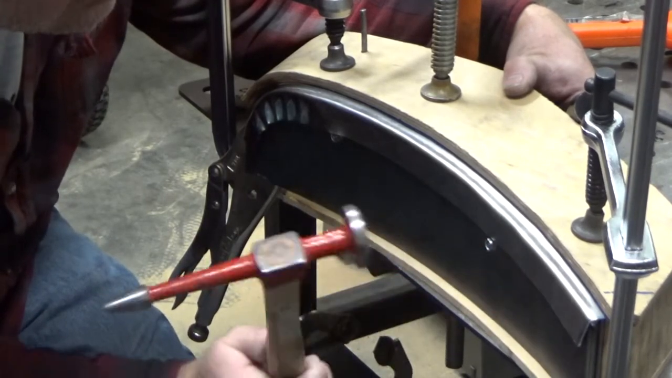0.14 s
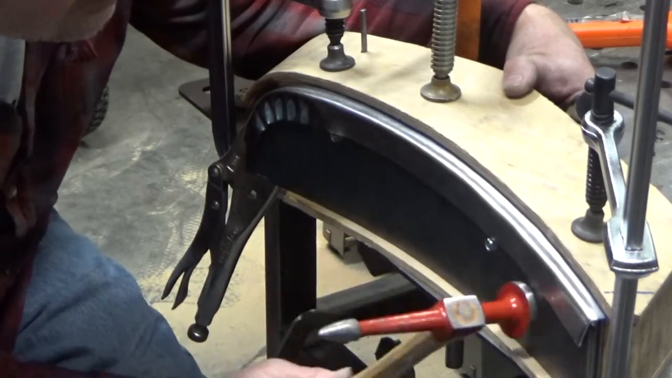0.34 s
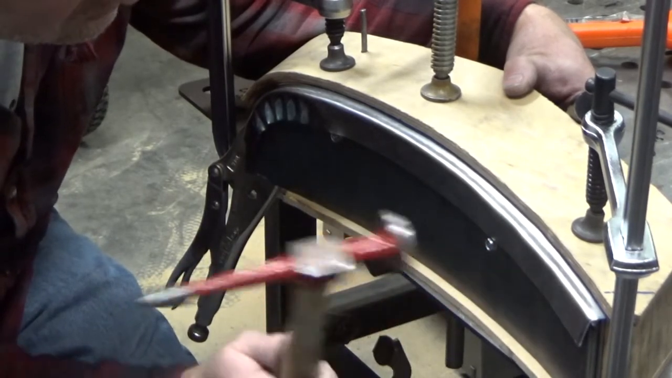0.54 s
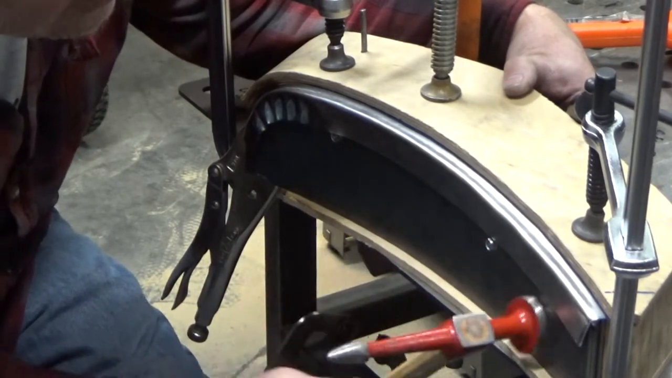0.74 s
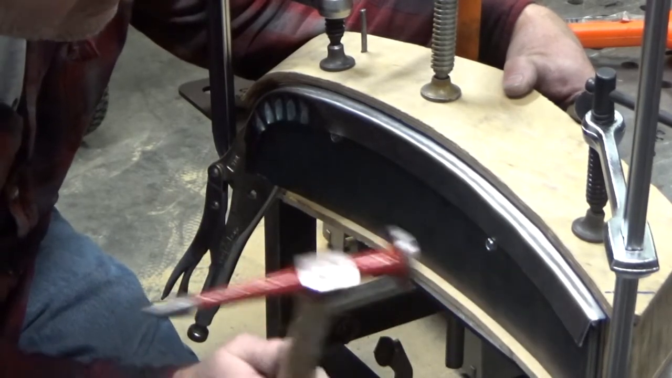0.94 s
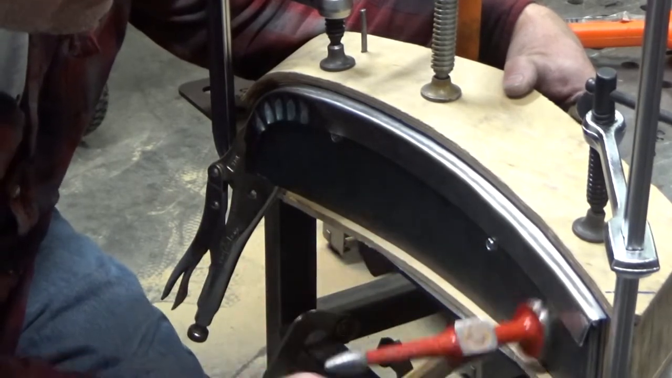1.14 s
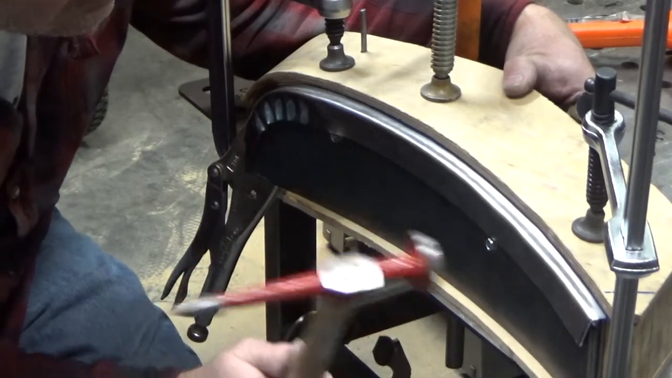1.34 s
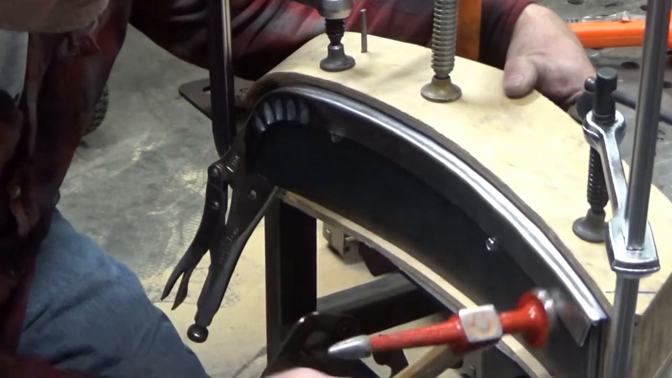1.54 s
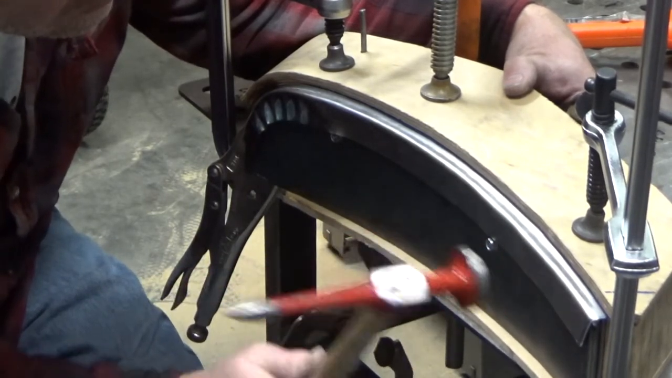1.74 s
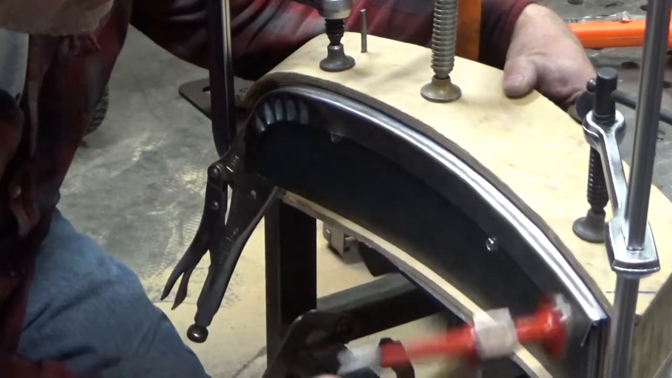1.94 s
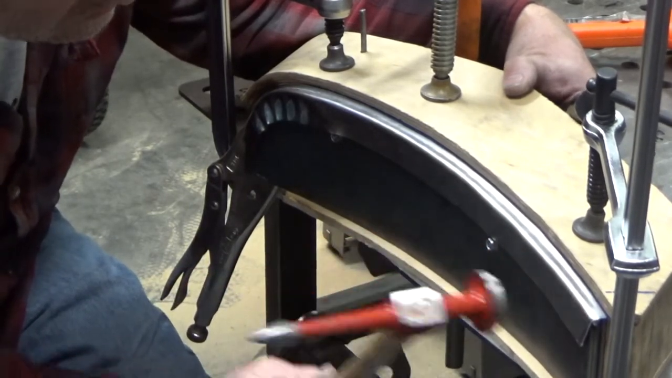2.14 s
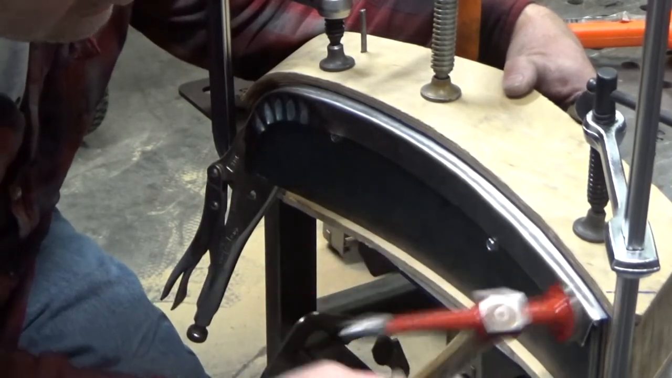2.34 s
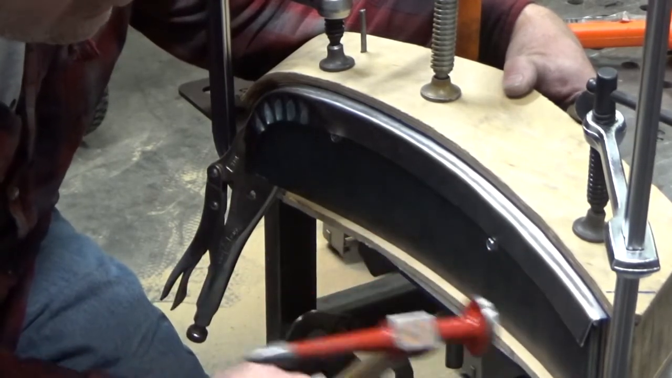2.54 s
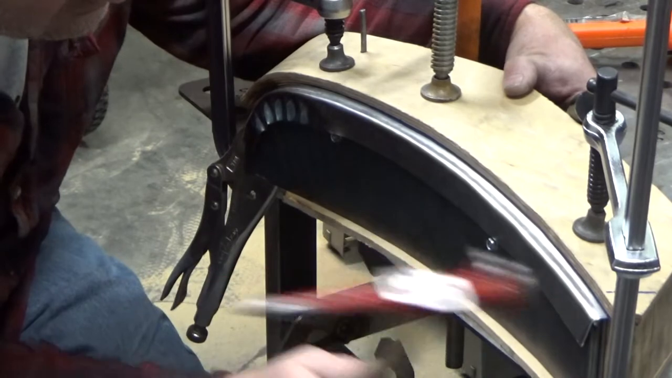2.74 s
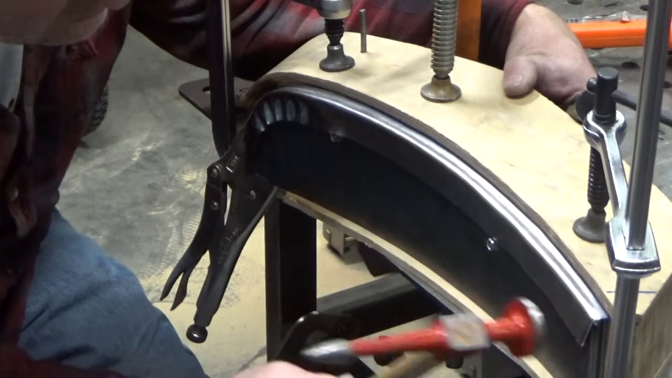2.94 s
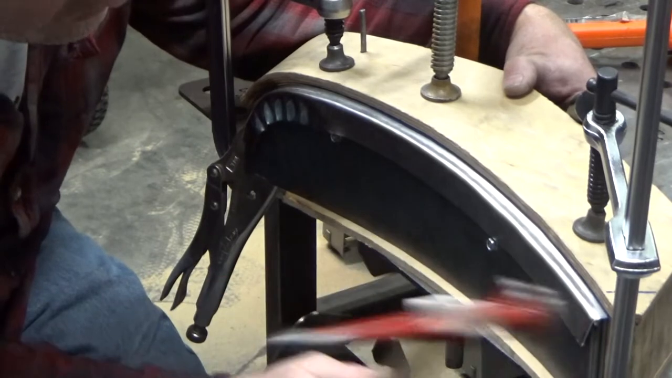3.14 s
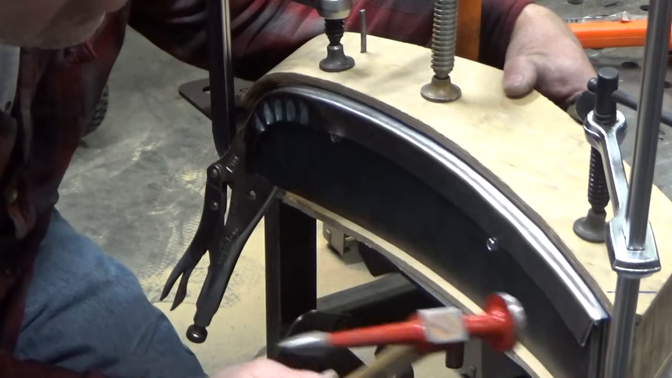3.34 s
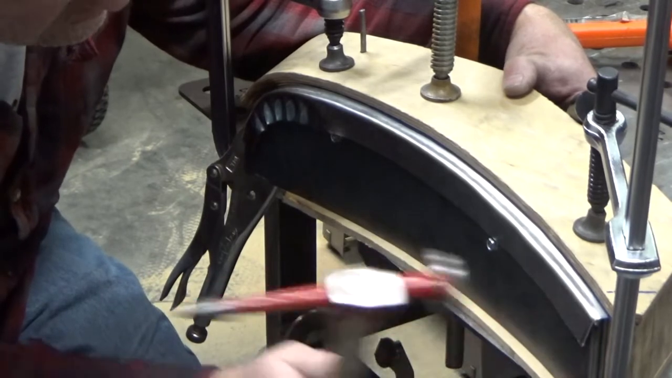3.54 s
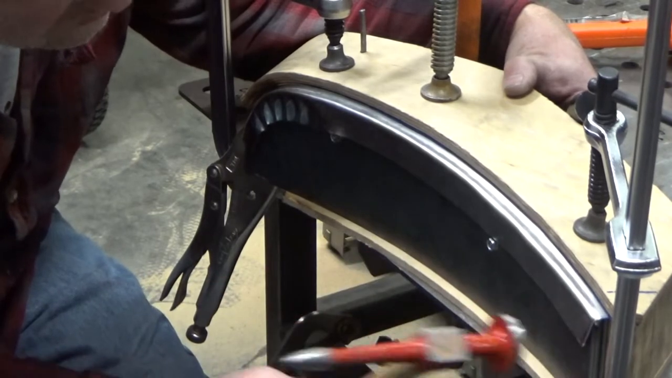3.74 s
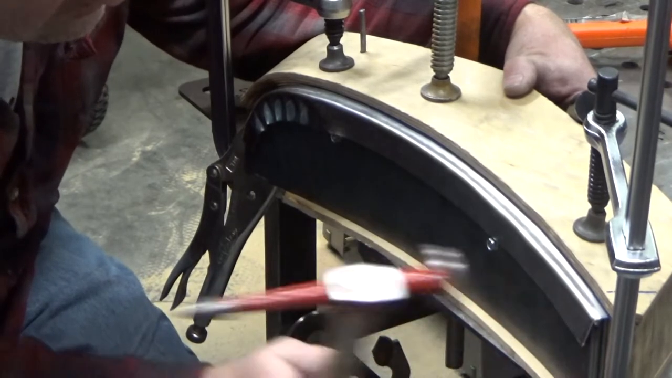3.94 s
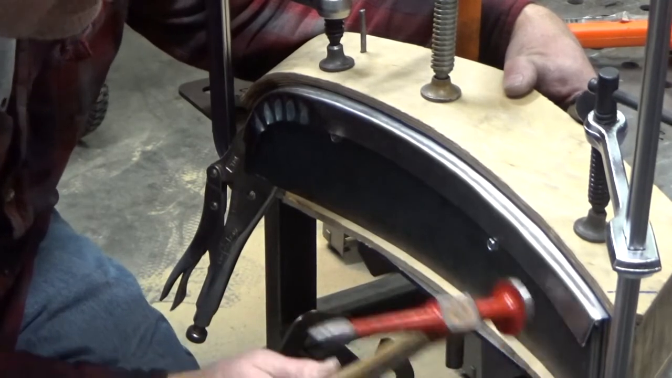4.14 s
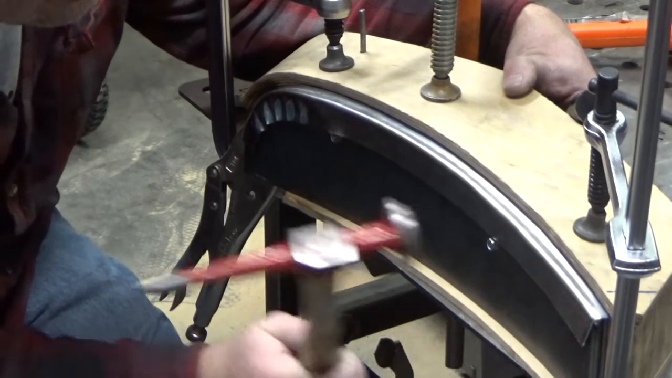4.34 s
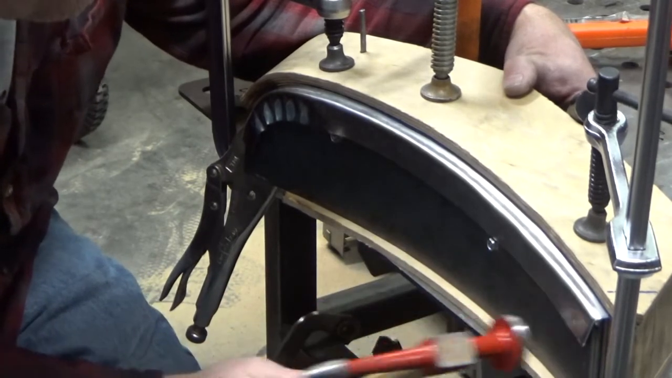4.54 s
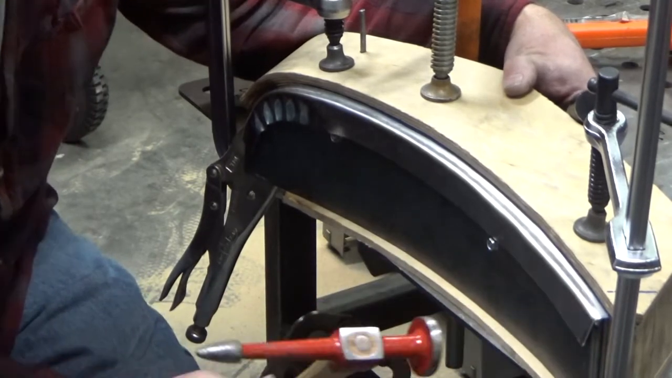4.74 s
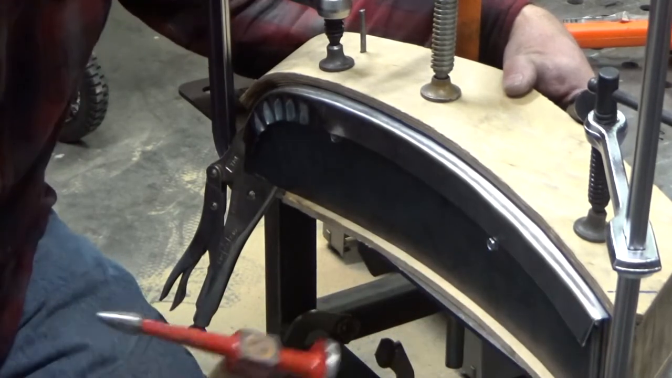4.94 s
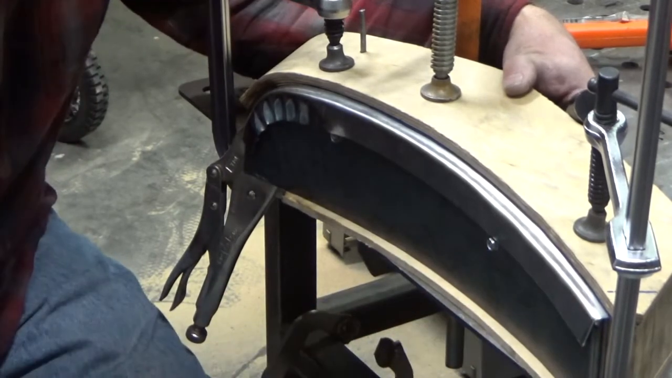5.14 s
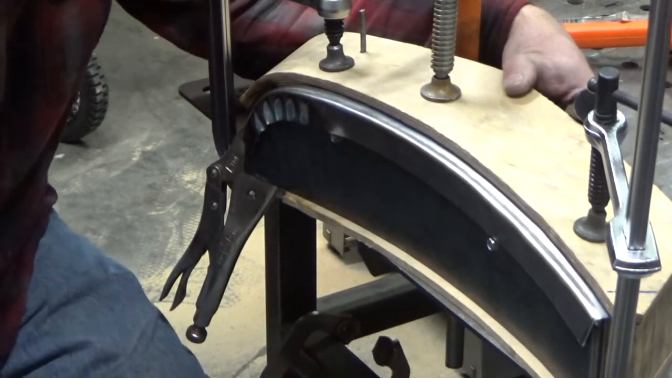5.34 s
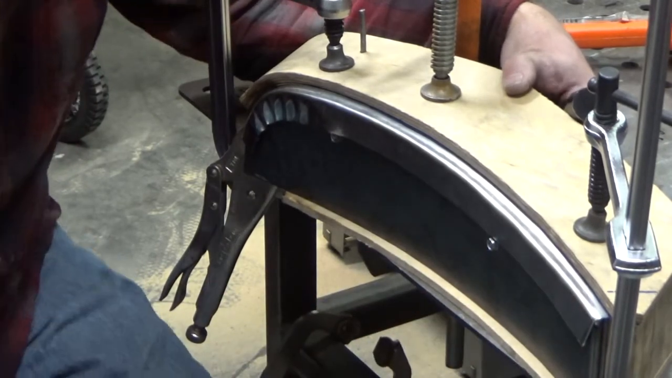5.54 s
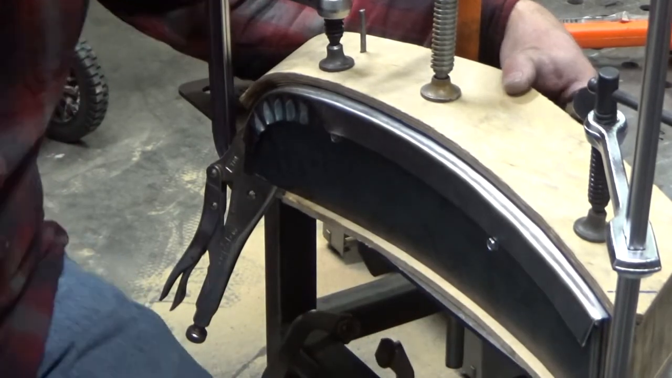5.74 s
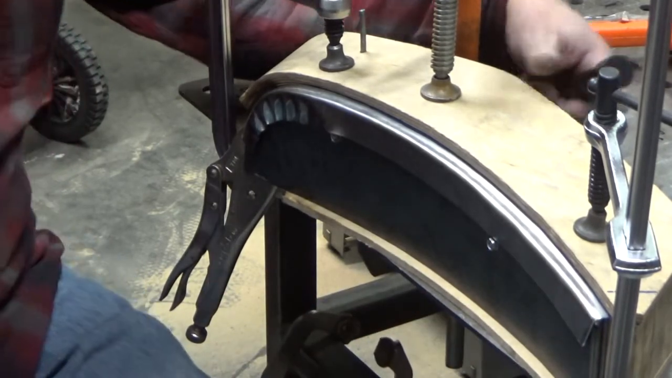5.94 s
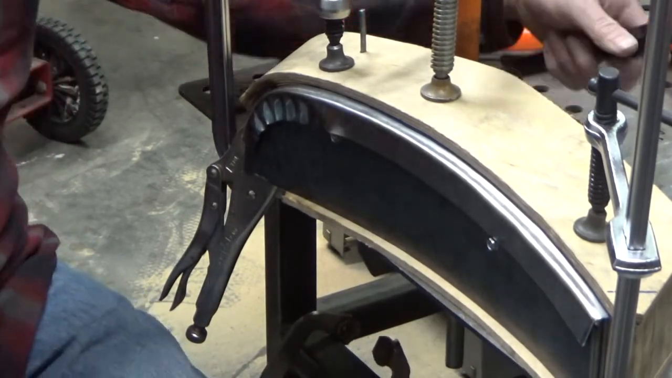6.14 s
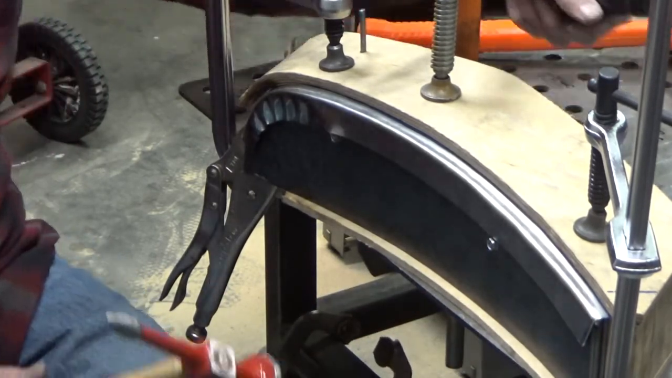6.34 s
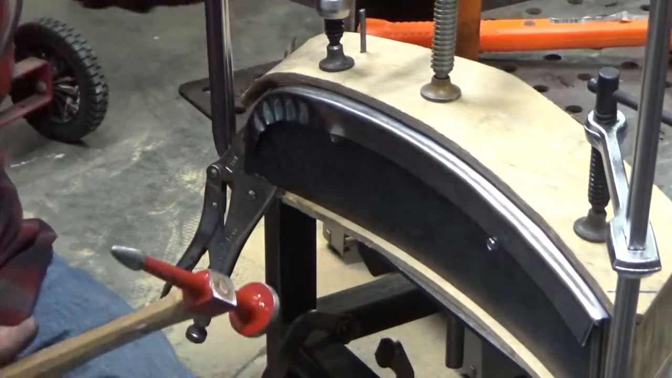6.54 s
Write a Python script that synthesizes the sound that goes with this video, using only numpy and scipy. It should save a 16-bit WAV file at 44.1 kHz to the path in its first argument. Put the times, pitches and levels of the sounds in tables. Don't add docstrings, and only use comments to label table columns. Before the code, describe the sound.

Close up in a reverberant garage, a body hammer strikes thin sheet steel clamped over a wooden form, a little over two blows a second. Each hit is a bright, dense, flattened crash with a short clattery tail and high ringing. After about five seconds the blows stop; the ring fades over faint lamp hum, then a stool drags and tools clink.

```python
import sys
import numpy as np
from scipy import signal
from scipy.fft import rfft, irfft, next_fast_len
from scipy.io import wavfile
from scipy.ndimage import uniform_filter1d, minimum_filter1d, map_coordinates

SR = 44100
rng = np.random.default_rng(int(sys.argv[2]) if len(sys.argv) > 2 else 0)


def field_ratio(decibels):
    return 10 ** (np.asarray(decibels, dtype=float) / 20)


def dump_mix(stems):
    frames = np.atleast_2d(stems).T
    limited = np.clip(frames, -1, 1)
    pcm = np.round(limited * 32767).astype(np.int16)
    wavfile.write(sys.argv[1], SR, pcm)


N = 294588

# start in seconds, strength, body, bite and edge in dB.
BLOWS = [(-.03, -5, -0.5, -2, 0), (.398, -7.5, -1, -2.5, -1), (.814, -7.5, -1, -2, -0.5),
         (1.251, -8.5, -0.5, 0.5, 1), (1.671, -7.5, -1, 0, 1), (2.071, -7.5, -1.5, 2.5, 1),
         (2.506, -8, -2.5, 0.5, 2), (2.923, -9, -1.5, -1.5, 2), (3.35, -9.5, -2, -1.5, 0),
         (3.742, -10, 1, -1, 1), (4.17, -8.5, 0, -1.5, 2.5), (4.568, -7.5, -0.5, -0.5, 0.5),
         (4.985, -9, -1.5, -2, 0)]
# quiet spot in seconds,
# face ring, tone before, dip and tone after in dB.
HEAD = [(.1, -8, -38, 4, -24), (.588, -27.5, -33.5, -2, -27), (1.008, -19, -40, -26, -29),
        (1.52, -.5, -29.5, -9.5, -29), (1.938, -7, -29, -10, -28.5), (2.348, 4.5, -34, -14, -32),
        (2.778, 0, -29.5, -12.5, -32.5), (3.186, -5, -24, -12, -28.5), (3.624, -1, -22.5, -7.5, -29.5),
        (4.004, 3, -34, -6, -39), (4.42, 3, -19.5, -19.5, -28.5), (4.834, -8.5, -40, -4.5, -32),
        (5.348, 4.5, -44, -27, -46)]
FACE_HZ = 10160


def unit(x):
    return x / np.sqrt(np.mean(x ** 2) + 1e-20)


def along(points, hz):
    f, v = np.transpose(points)
    return np.interp(np.log(hz + 1), np.log(f + 1), v)


def filtered(x, response):
    size = 2 * next_fast_len(x.shape[-1] // 2 + 4096)
    spectrum = rfft(x, size) * response(np.fft.rfftfreq(size, 1 / SR))
    return irfft(spectrum, size)[..., :x.shape[-1]]


def causal(db):
    cepstrum = irfft(db * np.log(10) / 20)
    half = len(cepstrum) // 2
    cepstrum[1:half] *= 2
    cepstrum[half + 1:] = 0
    return np.exp(rfft(cepstrum))


def peak(f, hz, width_hz, db):
    return field_ratio(db) * 1j * f * width_hz / (hz * hz - f * f + 1j * f * width_hz)


def pair(size, side_db):
    # frequency in Hz, left-right likeness 0-1.
    likeness = [(60, 1), (150, 0.96), (380, 0.86), (950, 0.47), (2380, 0.38), (5980, 0.48), (9500, 0.58),
                (11500, 0.9)]
    turn = lambda hz: np.arccos(np.clip(along(likeness, hz), -1, 1)) / 2
    mid_side = lambda hz: [np.cos(turn(hz)), field_ratio(side_db) * np.sin(turn(hz))]
    mid, side = filtered(rng.standard_normal((2, size)), mid_side)
    return np.array([mid + side, mid - side])


def add(out, start_s, x):
    k = round(start_s * SR)
    x = x[..., max(-k, 0):N - k]
    out[..., max(k, 0):max(k, 0) + x.shape[-1]] += x


def since_blow():
    t, start_s = np.arange(N) / SR, np.transpose(BLOWS)[0]
    k = np.searchsorted(start_s, t, side="right") - 1
    return k, t - start_s[k]


def background():
    # frequency in Hz, level in dB.
    hum_partials = [(119.8, 2.5), (240, -7.5), (359.8, 1)]
    # frequency in Hz, dB per Hz.
    air_db = [(15, -24), (25, -9.5), (129, -17.5), (183, -7.5), (349, 1), (410, -2), (1530, -3.5),
              (1950, -1.5), (3930, -7), (14300, -22), (15500, -40.5)]
    # level in dB, t60 in seconds.
    jolts = [(-49, 1.4), (-64, 1), (-53, 1), (-55.5, 1.3), (-49.5, .9), (-49.5, .9), (-51, 1),
             (-41.5, 0.73), (-54.5, 3), (-57, 4), (-55.5, 4), (-57.5, 1.5), (-49.5, 2.1)]
    hum_db, duck_db, recover_s = -70, -5, 0.26
    t, (k, age_s) = np.arange(N) / SR, since_blow()
    hum = sum(field_ratio(db - 0.5) * np.sin(2 * np.pi * (hz * t + rng.random())) for hz, db in hum_partials)
    air = unit(filtered(pair(N, side_db=-3.5), lambda f: field_ratio(along(air_db, f))))
    buzz_db, t60_s = np.transpose(jolts)[:, k]
    buzz = uniform_filter1d(field_ratio(buzz_db - 60 * age_s / t60_s), size=SR // 25)
    air_level = field_ratio(-59.5 + duck_db * np.exp(-age_s / recover_s))
    return (field_ratio(hum_db) + buzz) * hum + air_level * air


def shifting():
    # start, rise and hold in seconds, drag and scrape in dB.
    pushes = [
        (5.987, .015, .02, -52.5, -49),
        (6.04, .15, 0.057, -42, -49),
        (6.278, .008, .05, -62, -49),
        (6.395, .02, 0.084, -41, -37),
    ]
    # frequency in Hz, dB per Hz.
    drag_db = [(18, -44), (30, -13), (81, 2), (137, 3.5), (348, 3), (402, 9.5), (700, -26), (910, -60),
               (1540, -120)]
    scrape_db = [(290, -32.5), (500, -3.5), (978, -0.5), (1090, -5.5), (1250, -6), (2620, -12), (4500, -13),
                 (5850, -50), (9900, -120)]
    rustle_db = [(1760, -18), (3000, -3), (4950, -1.5), (5380, -5.5), (5640, 4), (11800, -8), (15500, -32)]
    # frequency and width in Hz, level in dB.
    tools = [(1700, 110, -6), (1960, 38, -5), (2230, 62, 0), (2340, 76, 0.5), (2650, 45, 3), (3260, 45, -1),
             (3520, 43, 3)]
    let_go_s = 0.95
    out, t = np.zeros((2, N)), np.arange(N) / SR

    def push(start_s, rise_s, hold_s):
        released_s = np.maximum(t - start_s - rise_s - hold_s, 0)
        return np.clip((t - start_s) / rise_s, 0, 1) * field_ratio(-60 * released_s / let_go_s)

    drag = sum(field_ratio(db) * push(s, rise, hold) ** 1.2 for s, rise, hold, db, _ in pushes)
    scrape = sum(field_ratio(db) * push(s, rise, hold) for s, rise, hold, _, db in pushes)
    rustle = field_ratio(-28.5) * scrape ** 0.56
    steel = lambda f: 1 + field_ratio(6.5) * sum(peak(f, *mode) for mode in tools)
    layers = [(drag, drag_db, 40, 2.5), (scrape, scrape_db, 90, 1.5), (rustle, rustle_db, 120, 1.5)]
    for level, colour, rate_hz, lumps_db in layers:
        coarse = rng.standard_normal(int(N * rate_hz / SR) + 4)
        lumps = map_coordinates(coarse, [np.arange(N) * rate_hz / SR])
        noise = filtered(pair(N, side_db=-5.5), lambda f: field_ratio(along(colour, f)) * steel(f))
        out += field_ratio(-5) * level * unit(field_ratio(lumps_db * lumps) * noise)
    return out


def knocks():
    # start in seconds, peak in dB, pitch and width in Hz.
    thuds = [(5.997, -39.5, 320, 32), (6.196, -34, 293, 200), (6.235, -40, 252, 200),
             (6.301, -43, 370, 109), (6.412, -30.5, 193.5, 40), (6.413, -30.5, 115, 40),
             (6.412, -41, 60, 40), (6.416, -33.5, 374, 40)]
    # start in seconds, peak in dB, pitch in Hz.
    clinks = [(6.05, -59, 4150), (6.11, -57, 3700), (6.284, -49, 4120), (6.29, -52, 3300),
              (6.305, -43.5, 1933), (6.437, -58, 5200), (6.468, -44, 5285), (6.47, -38, 1125),
              (6.44, -67, 11670)]
    # start in seconds, peak in dB, pitch and width in Hz, t60 in seconds.
    ticks = [(5.624, -59.5, 4500, 5020, .04), (5.997, -47.5, 2500, 2100, .4), (6.003, -53, 4000, 400, .37),
             (6.04, -51, 4100, 700, .3), (6.14, -58, 8260, 1500, .3), (6.197, -49, 4480, 2500, 0.38),
             (6.283, -36.5, 2330, 400, .12), (6.284, -39, 3600, 1700, 0.16), (6.397, -48.5, 9940, 4000, .2),
             (6.412, -43, 2110, 2990, .58), (6.522, -36, 2630, 298, 0.1)]
    thud_t60_s, clink_t60_s, clink_width_hz = 0.2, 0.5, 74
    out, t = np.zeros((2, N)), np.arange(SR // 2) / SR
    contacts = [(*row, thud_t60_s) for row in thuds]
    contacts += [(*row, clink_width_hz, clink_t60_s) for row in clinks]
    contacts += [tuple(row) for row in ticks]
    for start_s, db, hz, width_hz, t60_s in contacts:
        resonance = lambda f: peak(f, hz, width_hz, 0) * peak(f, hz, 2 * width_hz, 0)
        puff = unit(filtered(pair(len(t), side_db=-4.5), resonance))
        clean = 1 / (1 + (width_hz / 120) ** 2)
        ring = clean * np.sqrt(2) * np.sin(2 * np.pi * hz * t) + (1 - 0.51 * clean) * puff
        add(out, start_s, field_ratio(db - 2.0 - 60 * t / t60_s) * (1 - np.exp(-t * hz)) * ring)
    return out


def rings():
    # frequency in Hz, level in dB, t60 in seconds.
    form_modes = [(156.5, -49.5, 0.48), (204.4, -39.5, .6), (262, -45, 1), (303, -33, 0.72), (345, -37, .5),
                  (357.5, -19.5, 0.32)]
    form_rise_s, base_db, face_t60_s = 0.026, -16.5, 0.3
    out, t = np.zeros(N), np.arange(SR) / SR
    for (start_s, _, body_db, *_), (_, face_db, *_) in zip(BLOWS, HEAD):
        form = sum(field_ratio(db + rng.normal(0, 1.5) - 60 * t / t60_s) * np.sin(2 * np.pi * hz * t)
                   for hz, db, t60_s in form_modes)
        beat = 1 + 0.4 * np.sin(2 * np.pi * (22 * t + rng.random()))
        face = field_ratio(base_db + face_db - 60 * t / face_t60_s) * beat * np.sin(2 * np.pi * FACE_HZ * t)
        form *= field_ratio(body_db) * (1 - np.exp(-t / form_rise_s))
        add(out, start_s, form + np.minimum(t / 0.004, 1) * face)
    return out


def hammer_head():
    # time in seconds, tone in dB.
    lowered = [(5.348, -61), (5.482, -44.5), (5.678, -48), (5.728, -59), (5.838, -48.5), (5.894, -69.5),
               (6.11, -60), (6.254, -63)]
    tone_hz, quiet_half_width_s, fade_db_per_s, swell_s = 1933.3, 0.019, 34, 0.3
    knee_pan_db = 1.5
    t, (k, age_s) = np.arange(N) / SR, since_blow()
    quiet_s, _, before_db, dip_db, after_db = np.transpose(HEAD)[:, k]
    u = (t - quiet_s) / quiet_half_width_s
    swing_db = before_db + (after_db - before_db) * (1 + np.tanh(u)) / 2 + dip_db / (1 + u * u)
    swing_db -= fade_db_per_s * np.maximum(t - quiet_s, 0)
    swing = field_ratio(swing_db) * np.minimum(age_s / swell_s, 1)
    lowered_s, lowered_db = np.transpose(lowered)
    knee_db = np.interp(t, lowered_s, lowered_db, left=-120)
    level = np.where(t < lowered_s[0], swing, field_ratio(knee_db + [[knee_pan_db], [-knee_pan_db]]))
    tone = np.sin(2 * np.pi * tone_hz * t + np.array([[0.2], [-0.2]]))
    return level * field_ratio([[3.8], [2.2]]) * tone


def blows():
    # frequency in Hz, dB per Hz.
    crash_db = [(24, -52.5), (40, -30.5), (85, -31.5), (156, -14.5), (195, -22.5), (323, -9.5), (357, -13),
                (415, -11.5), (882, -5.5), (1320, -5), (1420, -5), (3890, -3), (10400, -8.5), (14400, -26),
                (16300, -41.5)]
    # frequency in Hz, t60 in seconds.
    garage = [(100, 0.37), (300, 0.64), (800, 0.64), (2000, 0.57), (5000, 0.53), (9000, 0.36), (15000, 0.2)]
    # frequency and width in Hz, level in dB, time in seconds when the hammer is nearest.
    sheet_modes = [(359.7, 17, 7.5, 2.7), (705, 25, 5.5, 2.7), (790, 6, -5, 5.7), (1053, 52, 3, 2.9),
                   (1410, 16, 4.5, 1.1), (1684, 35, 2, 3.6), (1880, 100, 0, 4.1), (2025, 110, -2.5, .8),
                   (2506, 14, 5, 2.8), (2650, 17, -0.5, 7.4), (3412, 10, 4, 0.44), (3910, 22, 5, .5),
                   (3970, 21, -9, 0.67), (3870, 12, -3.5, 3.8), (4060, 26, 0, 1.7),
                   (5450, 29.2, -9, 1.3333), (9200, 22, 18.5, 9.3)]
    # frequency and width in Hz, level in dB.
    panel = [(856, 260, -5), (14870, 370, 10.5)]
    # lag in seconds, level in dB.
    walls = [(0.077, -10.5), (.03, -22)]
    # level in dB, t60 in seconds.
    clamp = (-57, 1.7)
    clamp_hz, clump_db = 9001, 0.5
    clamp_db, clamp_t60_s = clamp
    out, t = np.zeros((2, N)), np.arange(SR + SR // 2) / SR
    for (start_s, db, body_db, bite_db, edge_db), (_, face_db, *_) in zip(BLOWS, HEAD):
        hz, frame_s, z = signal.stft(pair(len(t), side_db=-5.5), SR, nperseg=256)
        clumps = uniform_filter1d(rng.standard_normal(z.shape[1:]), size=3, axis=0)
        clumps = unit(uniform_filter1d(clumps, size=7, axis=1))
        decay_db = -60 * frame_s / along(garage, hz)[:, None]
        crash = signal.istft(z * field_ratio(clump_db * clumps + decay_db), SR, nperseg=256)[1][:, :len(t)]
        echoes = sum((t >= lag) * field_ratio(g - 60 * np.abs(t - lag) / 0.033) for lag, g in walls)
        crash *= (1 - np.exp(-t / 0.00089)) * (1 + 0.2 * field_ratio(-60 * t / 0.0076) + echoes)

        tilt = [(900, body_db), (1500, 0), (3000, 0), (4200, bite_db),
                (5800, (bite_db + edge_db) / 2), (8700, edge_db), (11000, 0)]
        spot_db = rng.normal(0, 2.8, len(sheet_modes))
        sheet = lambda f: sum(peak(f, c, w, g + d - 4 * abs(start_s - best))
                              for (c, w, g, best), d in zip(sheet_modes, spot_db))
        broad = lambda f: sum(peak(f, *mode) for mode in panel) + peak(f, 8830, 800, 4 * edge_db - 11)
        face = lambda f: peak(f, FACE_HZ, 27, face_db)
        colour = lambda f: causal(along(crash_db, f) + along(tilt, f))
        crash = filtered(crash, lambda f: colour(f) * (1 + sheet(f) + broad(f) + face(f)))
        add(out, start_s, field_ratio(db + 2) * crash / np.std(crash[:, :SR // 10]))

        clamp_level = field_ratio(clamp_db + edge_db - 60 * t / clamp_t60_s)
        add(out, start_s, clamp_level * np.sin(2 * np.pi * (clamp_hz * t + rng.random())))
    return out


def scene():
    return background() + shifting() + knocks() + rings() + hammer_head() + blows()


def roll_off(x):
    return signal.sosfilt(signal.butter(12, 16470, fs=SR, output="sos"), x)


def record(dry):
    ceiling_db, sense_s, top, top_hz = -14, 0.0068, 1.0, 16600
    power = uniform_filter1d(np.mean(dry ** 2, 0), int(sense_s * SR))
    level = np.sqrt(np.abs(power) + 1e-12)
    need_db = np.minimum(ceiling_db - 20 * np.log10(level), 0)
    gain_db = uniform_filter1d(minimum_filter1d(need_db, SR // 100), SR // 50)
    x = dry * field_ratio(gain_db)
    clipped = x / (1 + np.abs(x / top) ** 4) ** (1 / 4)
    mix = filtered(clipped, lambda f: 1 / (1 + (f / top_hz) ** 60))
    return roll_off(mix)


dry = scene()
out = record(dry)
dump_mix(out)
```